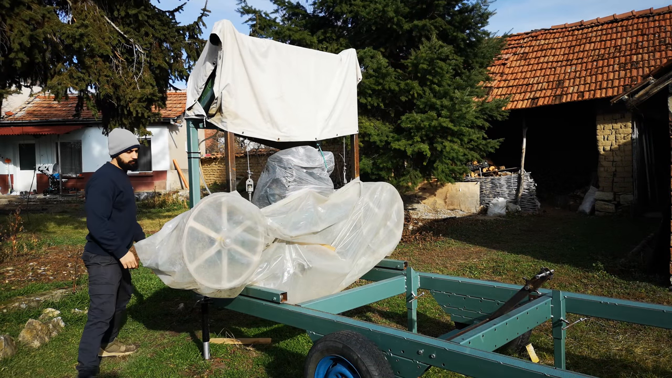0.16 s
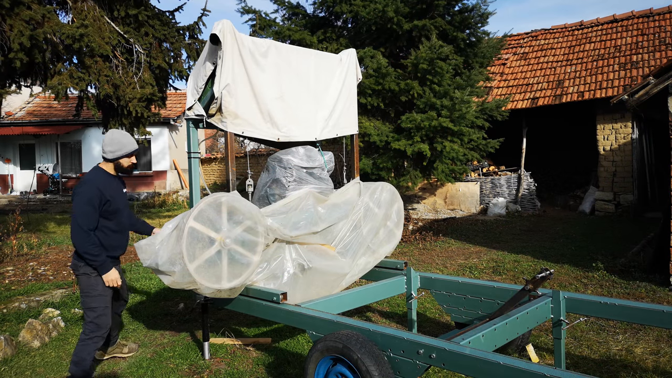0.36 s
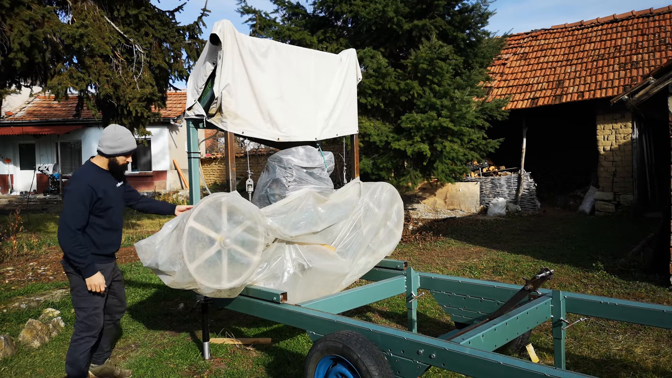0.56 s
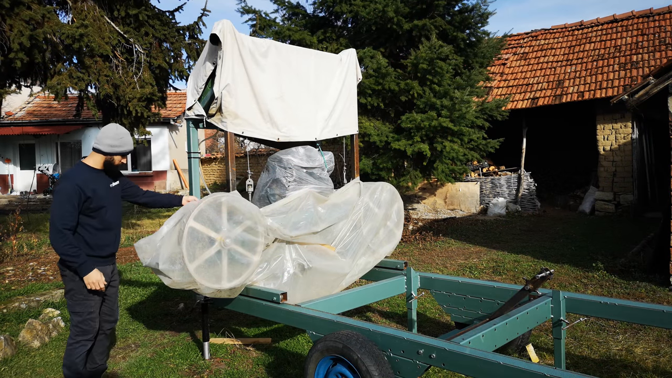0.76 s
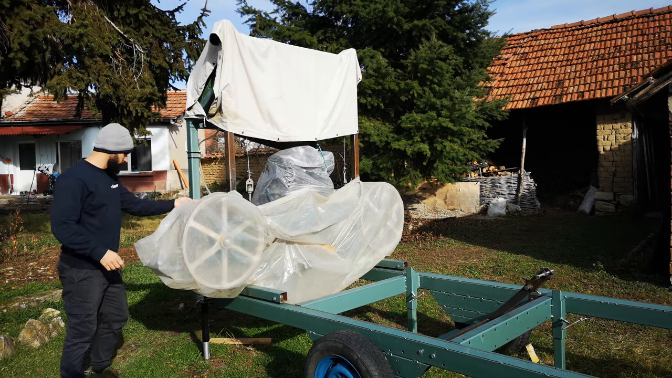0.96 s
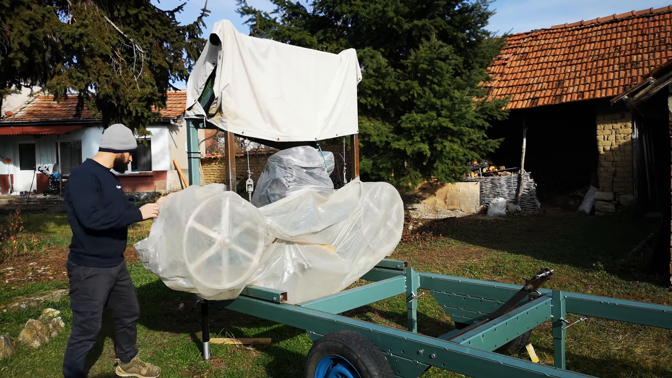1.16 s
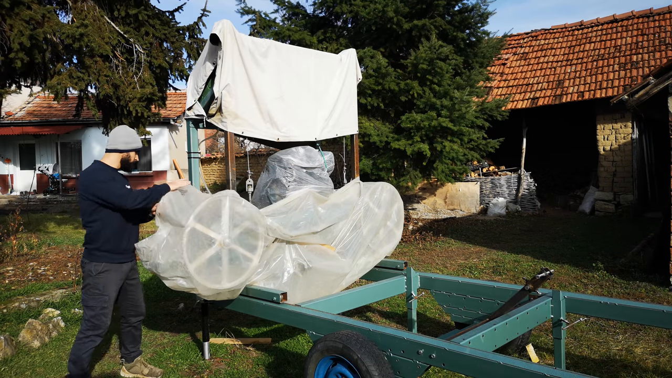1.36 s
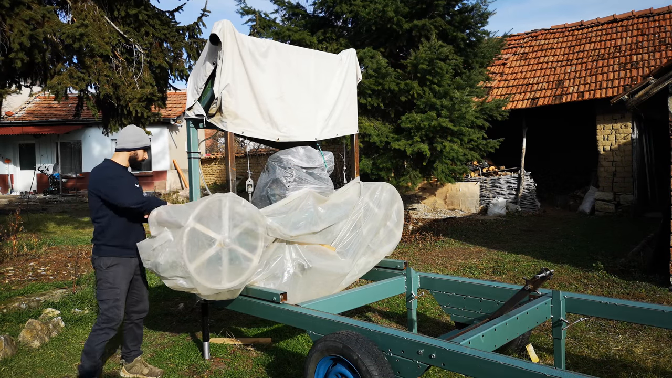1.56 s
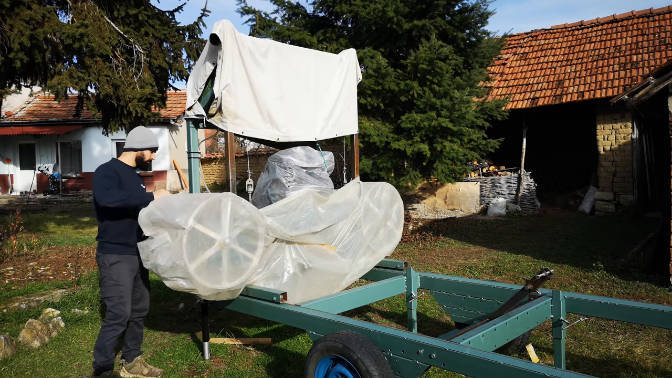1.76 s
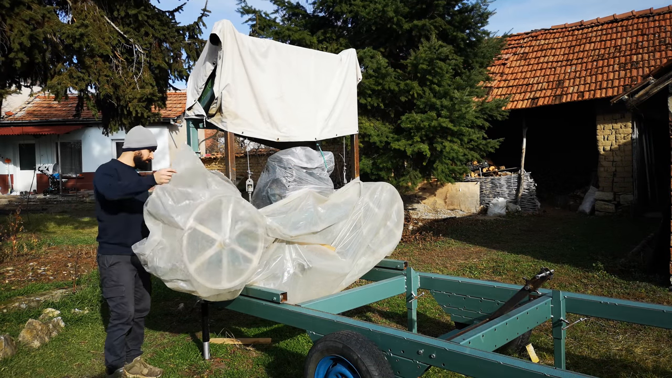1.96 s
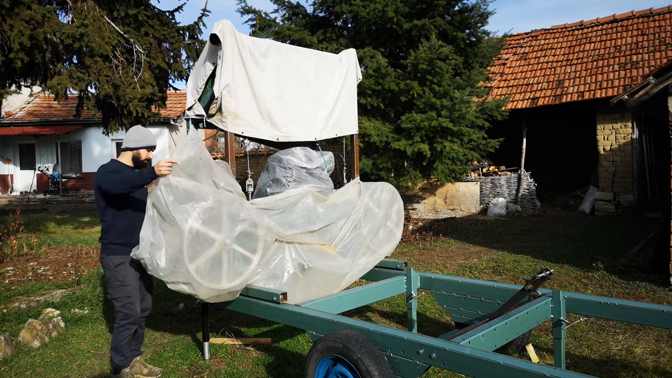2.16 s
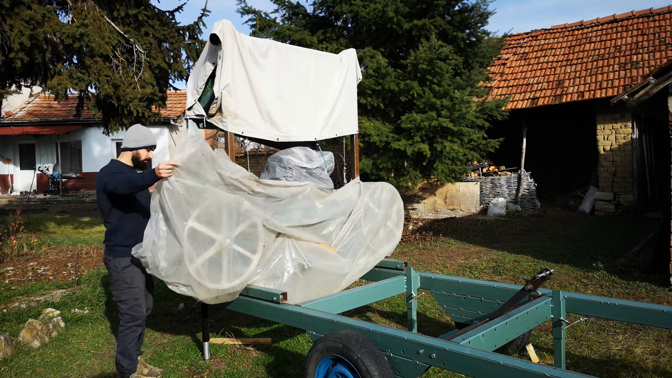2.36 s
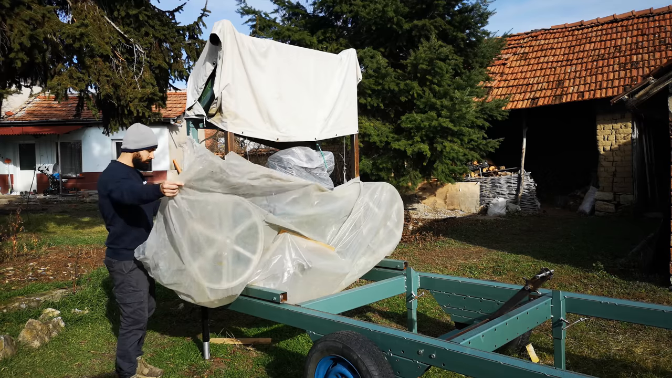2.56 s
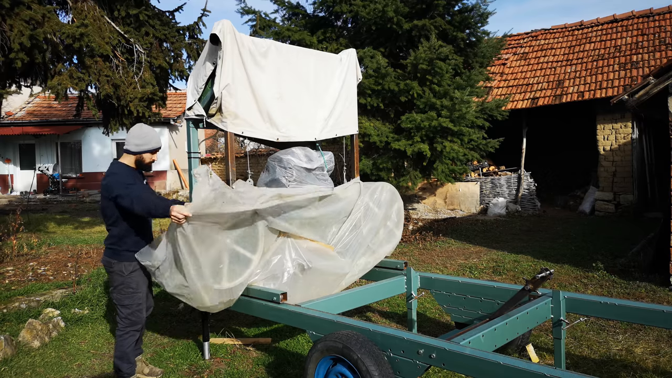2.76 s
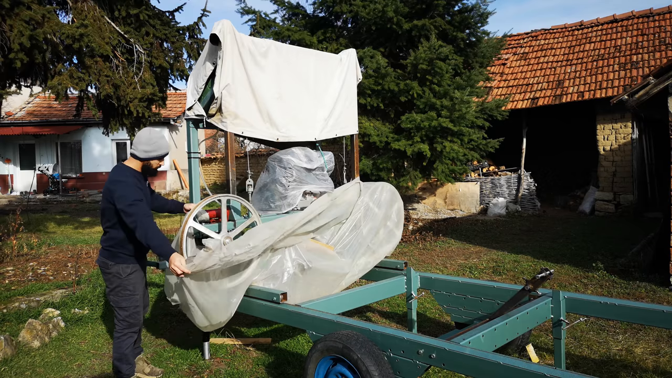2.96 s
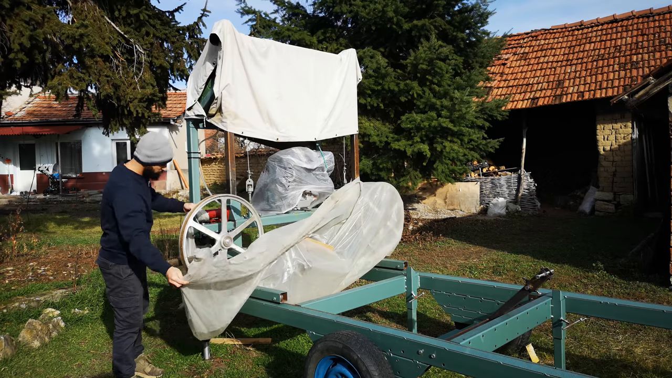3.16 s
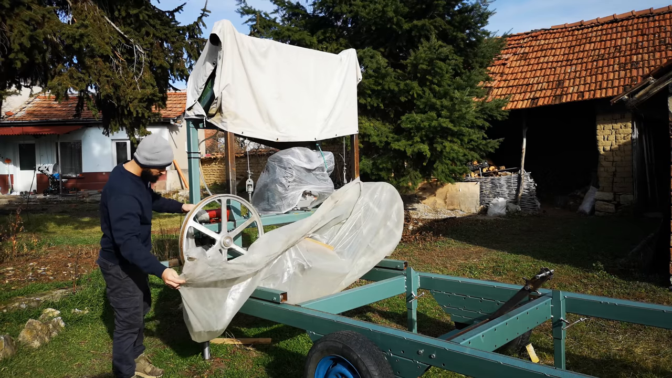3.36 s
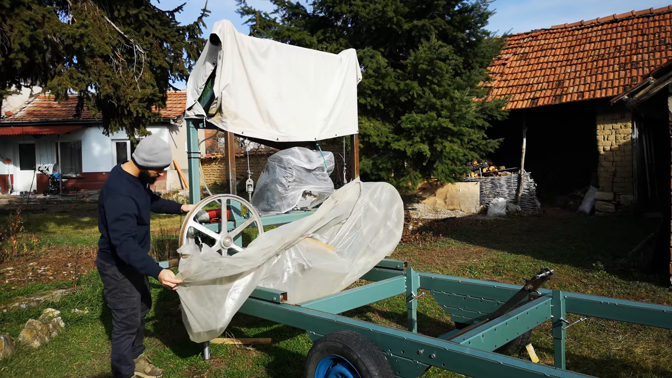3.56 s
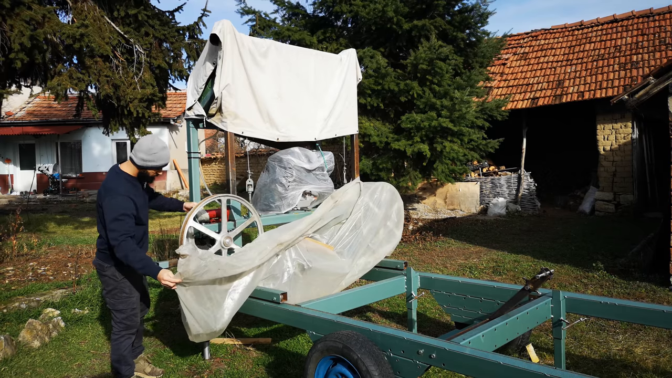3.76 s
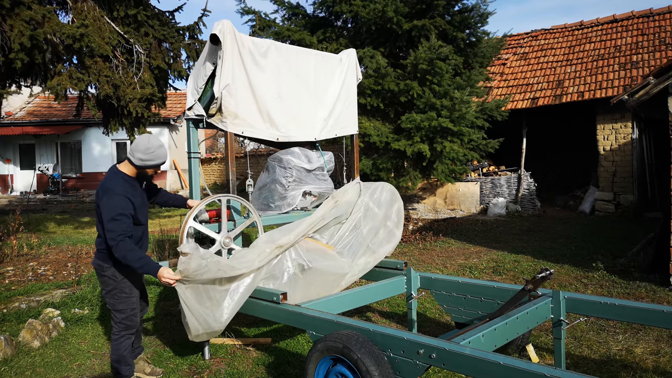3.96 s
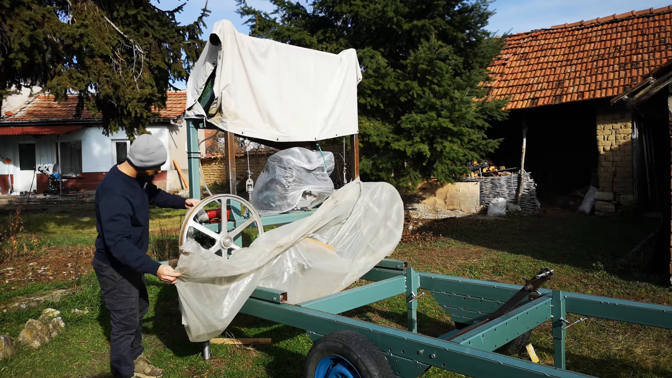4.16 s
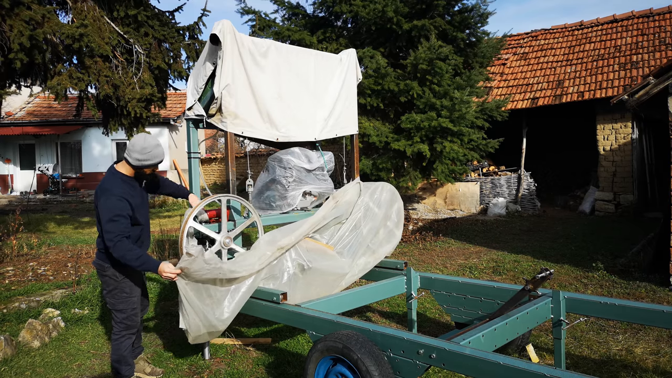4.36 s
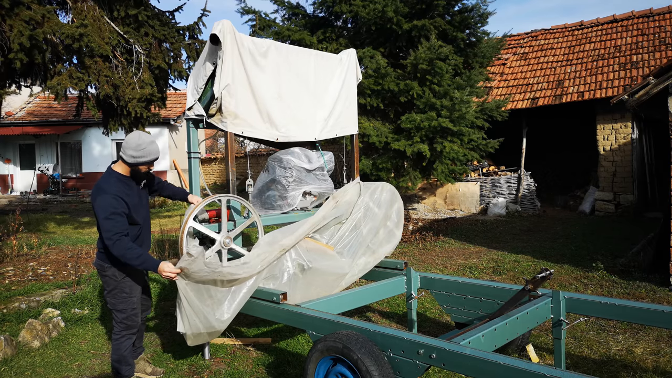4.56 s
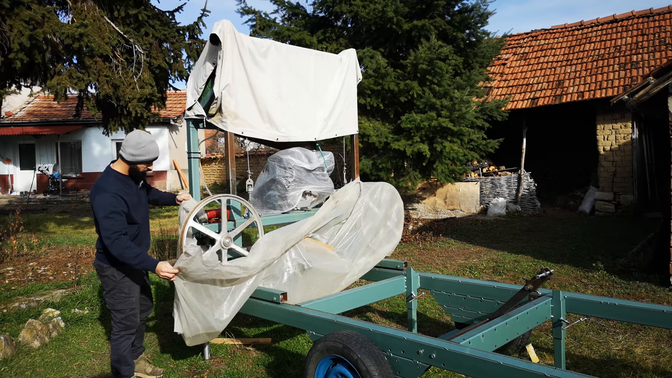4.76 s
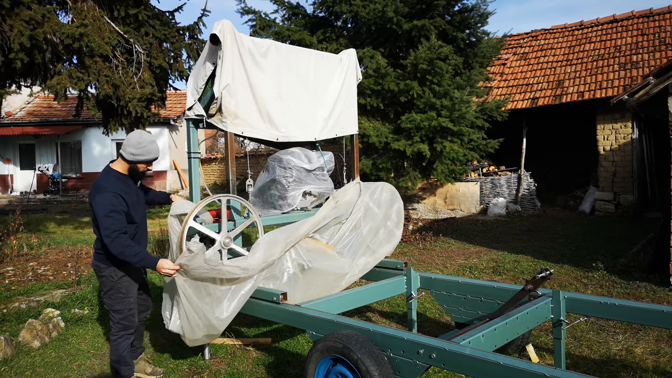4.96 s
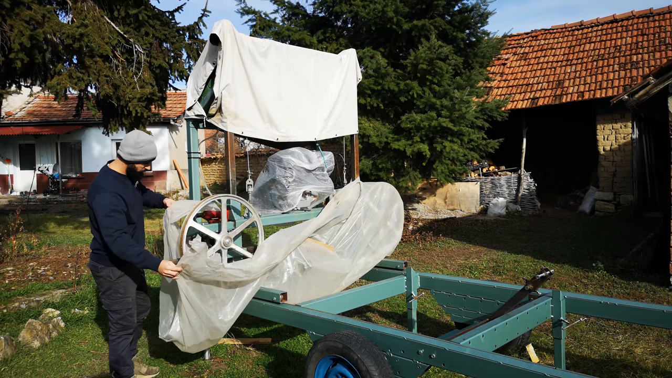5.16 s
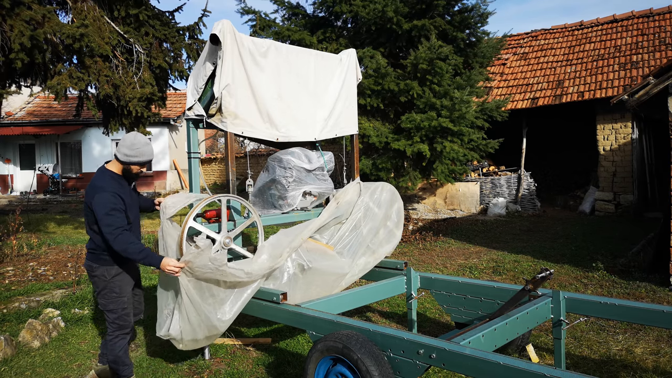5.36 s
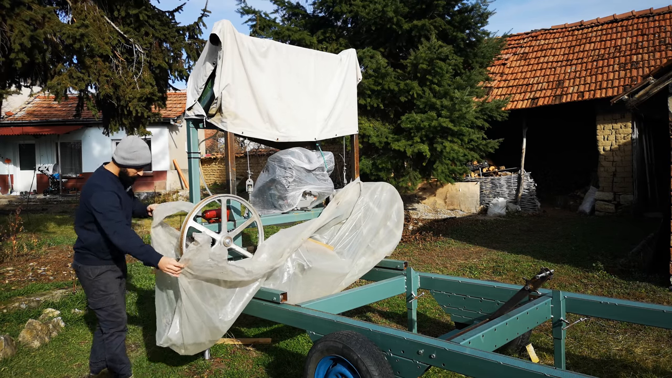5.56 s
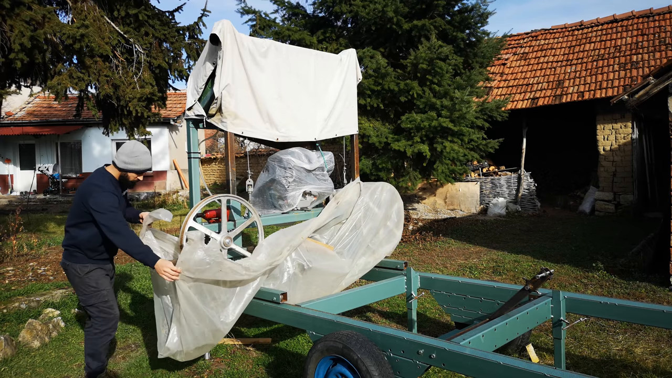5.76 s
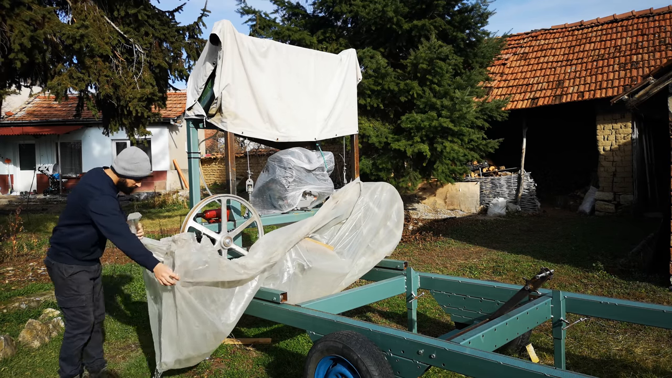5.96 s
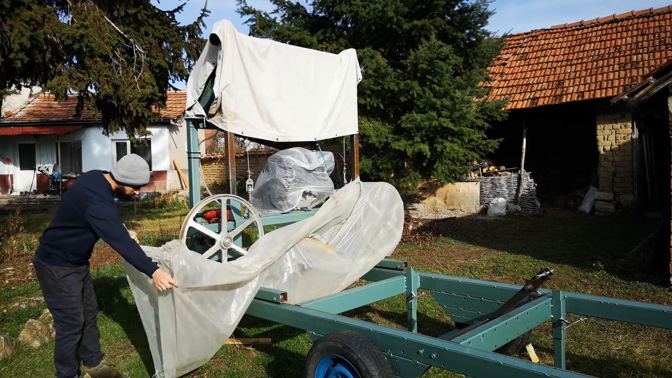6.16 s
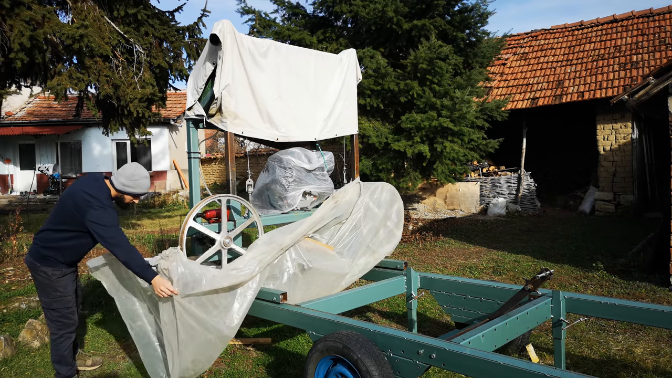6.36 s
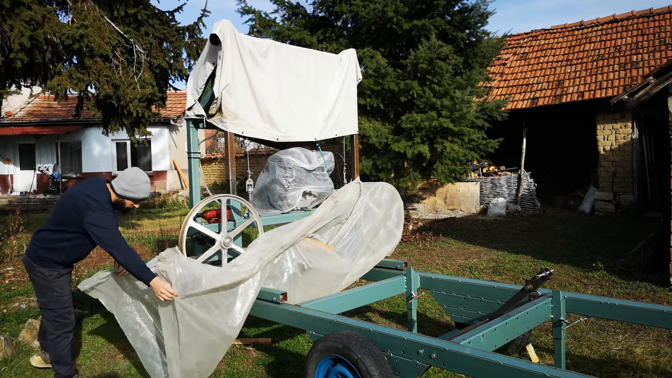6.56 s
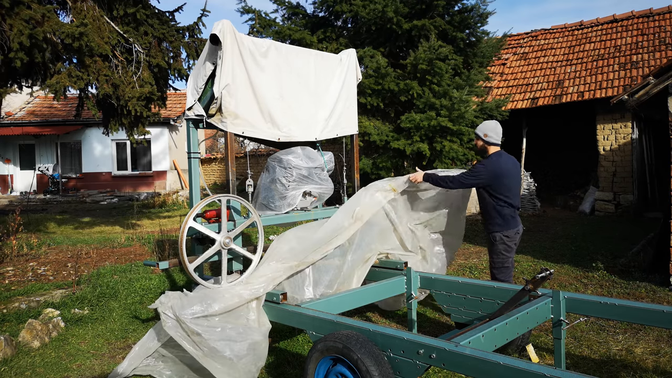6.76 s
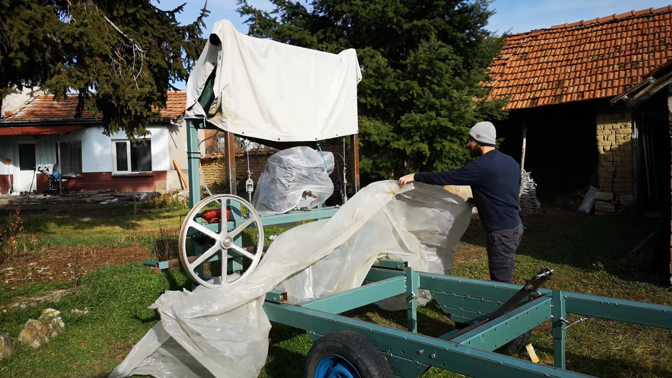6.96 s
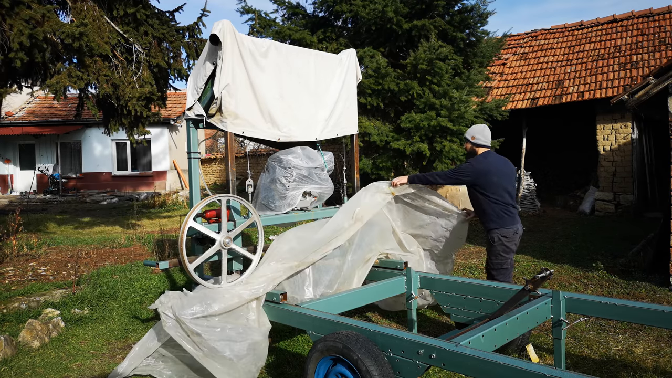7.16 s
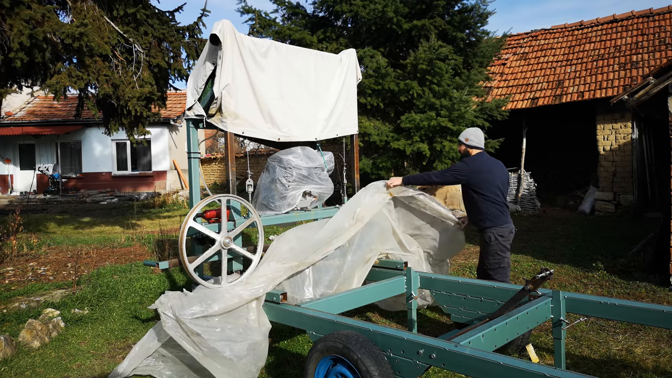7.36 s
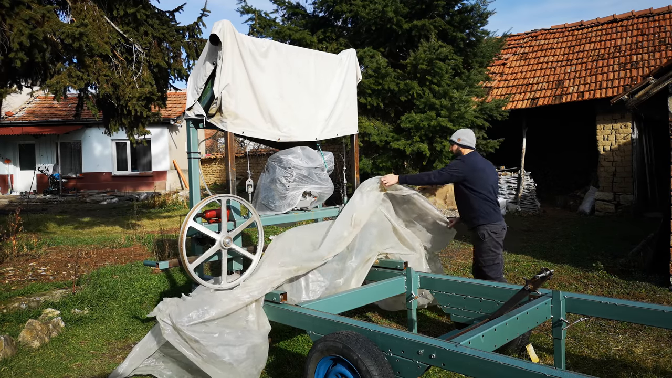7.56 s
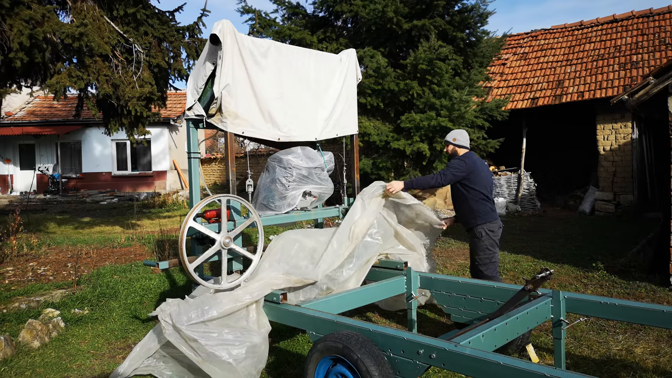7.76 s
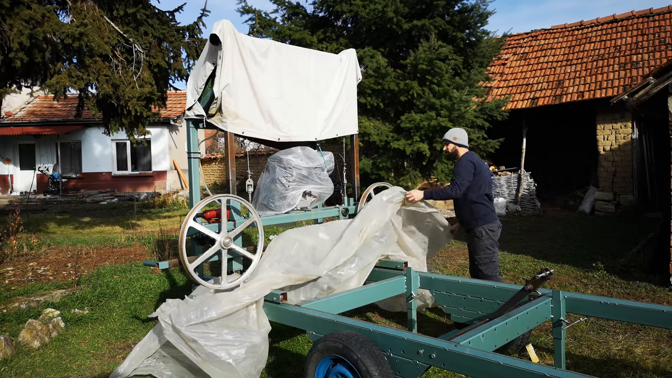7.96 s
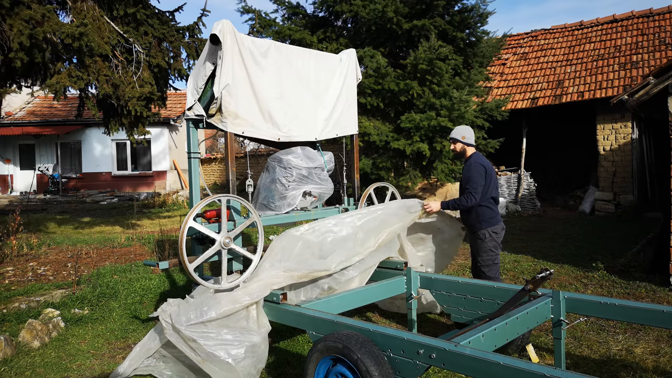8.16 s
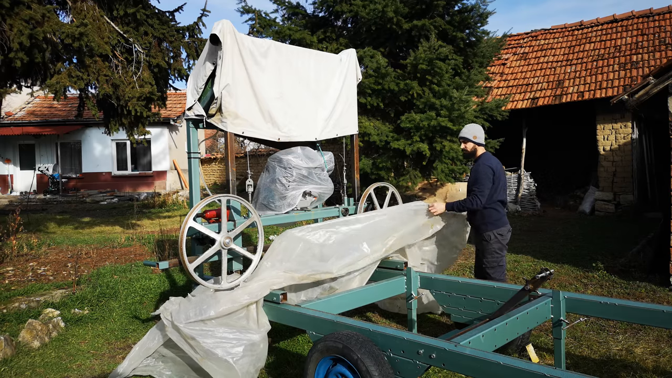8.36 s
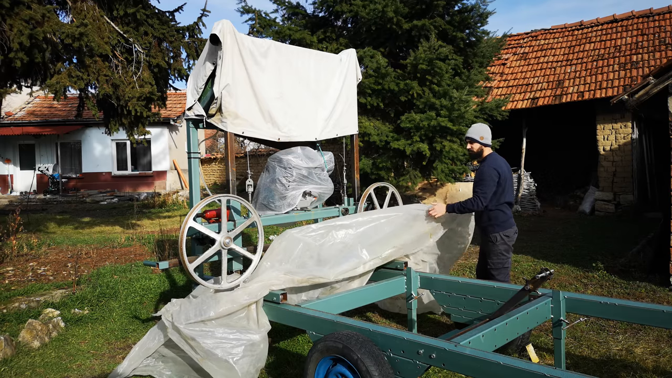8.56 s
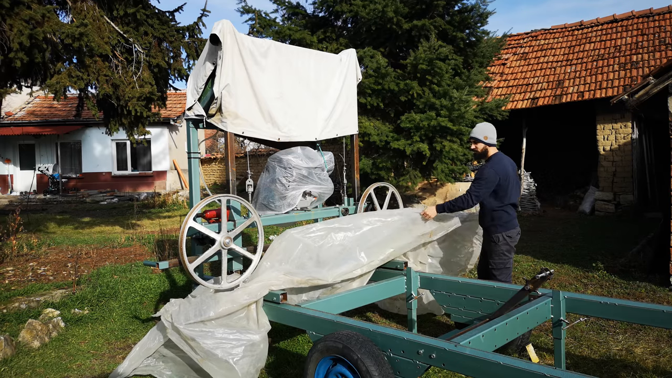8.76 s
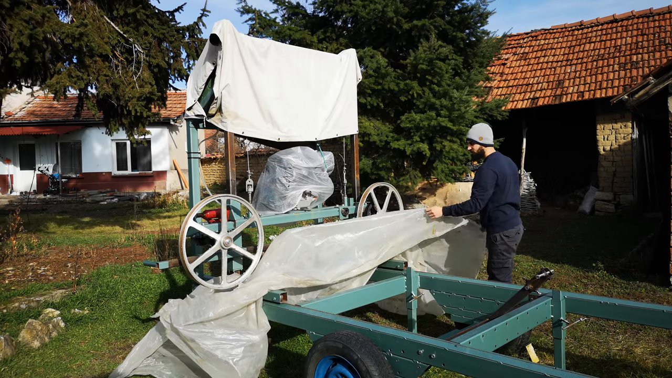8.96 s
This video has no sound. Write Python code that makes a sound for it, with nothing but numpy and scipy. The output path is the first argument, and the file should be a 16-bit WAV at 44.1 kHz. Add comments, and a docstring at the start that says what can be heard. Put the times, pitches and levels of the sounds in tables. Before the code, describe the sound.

A thin plastic sheet is pulled off a metal frame in a quiet yard. It crinkles in a string of short tugs, with sharp snaps from larger creases and a low rustle of loose folds. After a brief lull about a third of the way in, the tugging resumes and carries on to the end. Light wind rumbles on the microphone in puffs, and the yard adds a soft, short echo.

```python
"""In a yard, a sheet of thin plastic is pulled off a metal frame, first from the left, then the right.
With each tug thousands of tiny creases buckle into a crinkle, the largest snap out singly with a knock
and a tick, and the loose folds rustle low. Now and then the film drags over a rim, which sings faintly.
The ground and the walls echo softly; a light wind buffets the microphone."""
import sys
import numpy as np
from scipy import signal
from scipy.fft import rfft, irfft
from scipy.io import wavfile

SR = 44100
rng = np.random.default_rng(int(sys.argv[2]) if len(sys.argv) > 2 else 0)


def wav_out(sig):
    """Save sig, one row per channel (or a flat mono array), as 16-bit PCM at SR to the path in sys.argv[1]."""
    wavfile.write(sys.argv[1], SR, np.round(np.clip(np.atleast_2d(sig).T, -1, 1) * 32767).astype(np.int16))


N = 396900
T = np.arange(N) / SR
HZ = np.fft.rfftfreq(4096, 1 / SR)
SIDE_CHANGE_S = 6.74  # the pulling moves from the left of the frame to the right

# the largest creases: t/s, knock peak level/dB, knock f/Hz, tick level/dB, tick f/Hz
BIG_SNAPS = [(0.736, -44, 1840, -57, 5600), (0.787, -36, 1750, -53.5, 4810), (0.873, -34, 1700, -40, 4870),
             (1.358, -31.5, 1500, -42, 7140), (1.447, -36, 1860, -58, 5540), (1.744, -41, 1950, -47, 4900),
             (2.117, -30, 2240, -44.5, 5880), (2.259, -39, 1940, -42, 4550), (2.42, -44, 1900, -50, 5630),
             (2.615, -46, 2100, -32.5, 4800), (3.193, -29, 2540, -39, 5320),
             (3.601, -47, 1935, -44.5, 4060), (3.886, -59, 1800, -56.5, 4060),
             (4.046, -41, 1907, -60, 7730), (4.078, -40, 1580, -57, 5580), (4.225, -33, 2530, -61, 5050),
             (4.276, -29.5, 1940, -43, 5030), (4.356, -43, 1740, -50, 7200),
             (4.709, -25.5, 1970, -47, 7430), (4.736, -31, 1846, -53, 7810),
             (4.826, -36, 1930, -41.5, 7600), (5.024, -32.5, 1780, -58, 5160),
             (5.057, -33.5, 1770, -54, 3830), (5.128, -33, 1970, -60, 3520),
             (5.238, -32.5, 2130, -48, 5100), (5.293, -35.5, 1140, -41.5, 5270),
             (5.877, -34, 1770, -57, 5050), (5.969, -31, 2420, -42, 5610), (6.092, -33.5, 1900, -46, 7400),
             (6.16, -32, 2400, -43, 5120), (6.178, -32, 1980, -39, 7500), (6.267, -38.5, 1620, -42, 7600),
             (6.67, -39, 1270, -64, 7450), (6.807, -44, 2320, -59, 5040), (6.928, -43.5, 1475, -58, 4450),
             (6.995, -35, 1760, -37, 4530), (7.004, -41, 1360, -45, 5600), (7.156, -44.5, 1910, -54, 4900),
             (7.218, -40, 1750, -52, 3600), (7.368, -39, 2500, -48, 7700), (7.465, -46.5, 1320, -53, 5100),
             (7.575, -45, 1900, -40, 4470), (7.84, -32, 2000, -39, 5700), (7.991, -37.5, 2800, -49, 3500),
             (8.105, -51, 1700, -50.5, 4940), (8.237, -39.5, 1860, -63, 5400),
             (8.334, -31, 1310, -38, 5570), (8.384, -37, 2500, -37, 5850), (8.394, -42, 1980, -42, 4600),
             (8.862, -44, 1940, -47, 5360), (8.924, -44, 1800, -45, 5600)]


def amp(db):
    """Decibels to gain."""
    return 10 ** (np.asarray(db) / 20)


def rms(x):
    """Root mean square."""
    return np.sqrt(np.mean(x ** 2) + 1e-20)


def curve(points, hz):
    """A table's values at hz, joined on a log-frequency axis."""
    f, value = np.transpose(points)
    return np.interp(np.log(hz + 1), np.log(f + 1), value)


def band(x, lo_hz, hi_hz, order=3):
    """Causal band-pass."""
    sos = signal.butter(order, [lo_hz, min(hi_hz, SR / 2 - 1)], "band", fs=SR, output="sos")
    return signal.sosfilt(sos, x)


def colour(x, db):
    """Minimum-phase EQ with the gain db on the grid HZ: clicks keep their sharp attack."""
    log_gain = np.log(amp(np.r_[db, db[-2:0:-1]]))
    taps = np.fft.ifft(np.exp(np.conj(signal.hilbert(log_gain)))).real
    return signal.oaconvolve(x, taps[None], axes=1)[:, :x.shape[1]]


def drift(rate_hz):
    """Smooth random modulation of unit RMS."""
    rolloff = 1 + (np.fft.rfftfreq(N, 1 / SR) / rate_hz) ** 4
    slow = irfft(rfft(rng.standard_normal(N)) / rolloff, N)
    return slow / rms(slow)


def noise(spectrum, alike):
    """Coloured stereo noise, from wide (alike=0) to mono (alike=1)."""
    shared, left, right = rng.standard_normal((3, N))
    white = np.sqrt(alike) * shared + np.sqrt(1 - alike) * np.array([left, right])
    x = irfft(rfft(white) * amp(curve(spectrum, np.fft.rfftfreq(N, 1 / SR))), N)
    return x / rms(x.mean(0))


def add(mix, s, sound):
    """Mixes in a multichannel sound at s seconds."""
    part = mix[:, max(round(s * SR), 0):][:, :sound.shape[1]]
    part += sound[:, :part.shape[1]]


def yard_air(level_db=-74):
    """The quiet yard: a wide, steady bed of noise."""
    # colour of the ambience: f/Hz, level/dB
    spectrum = [(59, -18), (100, -8), (204, -6.5), (570, -17.5), (1700, -10.5), (4000, -18), (5600, -18),
                (7510, -19.5), (10100, -31.5), (15000, -29)]
    return amp(level_db) * noise(spectrum, alike=.13)


def wind(lumpy_db=2, gain_db=.5, breeze_db=-63, breeze_db_per_s=-.3):
    """Lumpy low buffeting on the microphone: a slowly easing breeze, and puffs that swell and die."""
    # colour of the rumble: f/Hz, level/dB
    spectrum = [(10, -7), (25, 2.5), (42, -2), (65, -8), (100, -18), (160, -32), (300, -40), (800, -93)]
    # puffs of wind: peak t/s, length/s, level/dB
    gusts = [(0.355, 0.087, -53), (0.665, 0.078, -50), (1.15, 0.24, -49), (1.36, 0.22, -51.5),
             (2.455, 0.084, -37), (2.608, 1, -44.5), (2.932, 0.27, -47), (3.9, 0.28, -49),
             (4.137, 0.13, -44.5), (4.29, 0.32, -55), (4.635, 0.12, -44), (5.05, .1, -54.5),
             (5.25, 0.22, -54), (6.002, .2, -56), (6.278, .25, -56.5), (6.698, 0.12, -48.5),
             (7.196, .12, -59.5), (7.68, 0.14, -65)]
    rumble = noise(spectrum, alike=.97) * amp(lumpy_db * drift(9))
    power = amp(breeze_db + breeze_db_per_s * T) ** 2
    for s, length_s, db in gusts:
        swell = np.cos(np.pi * np.clip((T - s) / length_s, -.5, .5))
        power += (amp(db) * swell) ** 2
    return rumble / rms(rumble) * amp(gain_db) * np.sqrt(power)


def pull(take_up_s=.06, grab_s=.7):
    """Tugs take up the slack, swell and settle: dB envelopes of the crinkle, its treble and its bass."""
    # tugs at the sheet: start t/s, length/s, crinkle level at the end of the pull/dB, swell/dB,
    # settling/(dB/s), relative treble of sharp creases/dB, relative bass of flexing folds/dB
    tugs = [(0.688, .21, -41.5, 15, 300, -6.5, -7.5), (0.978, 0.22, -44, 21, 75, -9.5, -11.5),
            (1.186, 0.16, -40, 7, 86, -6, -9), (1.608, 0.24, -46.5, 3, 230, -9, -7.5),
            (1.863, .39, -42, 13, 64, -8.5, -10), (2.371, .31, -42.5, 7, 58, -3.5, -12),
            (2.726, 0.2, -43.5, 1, 283, -.5, -11), (2.923, .24, -45, 4, 52.5, -7, -11),
            (3.84, 0.17, -61.5, 8, 100, -9.5, -18), (4.007, 0.16, -50, -1.5, 46, -9, -16.5),
            (4.213, 0.063, -49.5, 2, 41, -7, -14), (4.546, 0.27, -45, 9, 77, -5.5, -15),
            (4.858, 0.21, -48, -0.5, 75, -6, -11), (5.082, .2, -48, -2, 170, -6.5, -7),
            (5.344, 0.1, -56.5, 0, 58, -5.5, -6.5), (5.576, 0.077, -60.5, 1.5, 78, -5.5, -17),
            (5.697, .255, -47.5, 15.5, 61, -5, -8.5), (6.042, 0.082, -50, 0.5, 350, -1, -11),
            (6.129, 0.053, -43.5, 3.5, 42, -4.5, -10), (6.27, 0.14, -43, 8.5, 382, -7, -6),
            (6.45, 0.28, -57.5, 3.5, 126, -5.5, -8.5), (6.839, 0.16, -47.5, 16, 183, -5.5, -10),
            (7.071, 0.19, -56.5, 2, 177, -5, -4), (7.287, 0.26, -50.5, 15.5, 89, -6, -10),
            (7.544, 0.32, -44, -3.5, 163, -7, -9), (8.01, 0.17, -59, 0.5, 150, -9, -5.5),
            (8.171, .24, -40.5, 13.5, 172, -8, -9.5), (8.504, 0.18, -59, 4.5, 50, -6.5, -4),
            (8.807, 0.16, -53.5, -1.5, 80, -7, -8.5)]
    power = amp([[-75], [-84.5], [-74]]) ** 2 * (T > grab_s)  # once held, the sheet is never quite still
    settle_speed = np.array([[1], [1.25], [1]])  # the treble dies first
    t = T[:SR]
    attack = np.minimum(t / take_up_s, 1)
    for start_s, length_s, db, swell_db, settle_db_per_s, treble_db, bass_db in tugs:
        pull_db = db - swell_db * np.maximum(1 - t / length_s, 0) + np.array([[0], [treble_db], [bass_db]])
        fade_db = settle_speed * settle_db_per_s * np.maximum(t - length_s, 0)
        add(power, start_s, (attack * amp(pull_db - fade_db)) ** 2)
    return 10 * np.log10(power + 1e-12)


def crease(hz, cycles, tick_s, size=512):
    """One buckling crease: the brief ring of its panel and its dry tick, both of unit energy."""
    t = T[:size]
    ring = np.sin(2 * np.pi * hz * t) * np.exp(-t * hz / cycles)
    tick = rng.standard_normal(size) * np.exp(-t / tick_s)
    return ring / np.linalg.norm(ring), tick / np.linalg.norm(tick)


def arrive(click, lag_ms, spread_ms, bounce=.65, count=5):
    """A click reaches two microphone ports, directly and by short bounces off frame, folds and ground."""
    lag = lag_ms + spread_ms * rng.standard_normal()  # the left port hears it this much later
    phase_per_ms = -2j * np.pi * HZ / 1000
    direct = np.exp(phase_per_ms * np.array([[1 + lag / 2], [1 - lag / 2]]))
    late_ms = rng.uniform(2.192, 6.5, count) + rng.normal(0, .1, (2, count))
    bounces = rng.uniform(-1, 1, count)[:, None] * np.exp(phase_per_ms * late_ms[..., None])
    paths = direct + bounce * bounces.sum(1)
    return irfft(rfft(click, 2 * len(HZ) - 2) * paths)[:, :len(HZ) // 2]


def crackle(per_s, lag_ms, size_db=1.5, ring_share=.63, shift_db=3, panels=36):
    """Creases buckle at random; which panel sizes are busy shifts as the sheet changes shape."""
    out = np.zeros((2, N))
    onsets = np.flatnonzero(rng.random(N) < per_s / SR)
    size = amp(size_db * np.minimum(rng.exponential(1, N), 4.9))
    kick = size * rng.choice([-1, 1], N) / np.sqrt(per_s)  # denser, but no louder
    panel = rng.integers(0, panels, N)
    for group in np.array_split(np.arange(panels), 6):
        busy = amp(shift_db * np.clip(drift(17.2), -2, 2))
        for k in group:
            hz = 800 * 10 ** (k / panels)
            ring, tick = crease(hz, cycles=1.9, tick_s=.00084)
            train, hits = np.zeros(N), onsets[panel[onsets] == k]
            train[hits] = kick[hits] * busy[hits]
            click = arrive(tick + ring_share * np.sqrt(hz / 3000) * ring, lag_ms, spread_ms=.0265)
            out += signal.oaconvolve(train[None], click, axes=1)[:, :N]
    return out / rms(out)


def port_db():
    """The microphone ports resonate: EQ bumps in the treble, on the grid HZ."""
    # port resonances: f/Hz, width/Hz, boost/dB
    ports = [(1800, 640, 5), (5616, 2300, 3.5), (7630, 1300, 7)]
    return sum(db / (1 + (2 * (HZ - hz) / width) ** 2) for hz, width, db in ports)


def crinkle(level_db, treble_db, spectrum, lag_ms, body_db, edge_db, clump_db=1.5):
    """Faster pulling buckles more creases, in clumps, over the soft hiss of film sliding on film."""
    creases_per_s = np.clip(3200 * amp(.8 * (level_db + 48)), 700, 12000)
    grains = crackle(creases_per_s, lag_ms) * amp(clump_db * drift(55))
    hiss = .4 * rng.standard_normal((2, N))
    film = colour(grains + hiss, curve(spectrum, HZ) + port_db())
    body, edge = band(film, 620, 3200), band(film, 3600, 20000)
    body = body / rms(body.mean(0)) * amp(body_db)
    edge = edge / rms(edge.mean(0)) * amp(edge_db + treble_db - level_db)
    sheen = signal.sosfiltfilt(signal.butter(4, 8500, "high", fs=SR, output="sos"), edge)
    sheen_db = .35 * np.clip(treble_db + 50, -3, 10)  # a fast slide hisses highest
    return (body + edge + sheen * (amp(sheen_db) - 1)) * amp(level_db + tension())


def folds(flex_db, gain_db=-1.5, flap_db=2, left_lag_ms=-.39, right_lag_ms=.3):
    """Large loose folds flex and flap: a low rustle, nearly mono, with a slight delay between channels."""
    # colour of the low rustle: f/Hz, level/dB
    spectrum = [(30, -26), (55, -12), (80, 2.5), (120, -0.5), (190, -1), (250, -6), (400, -6.5),
                (560, -11.5), (750, -14), (1500, -61.5)]
    rustle = noise(spectrum, alike=1) * amp(flap_db * drift(40))
    lag_s = np.where(T < SIDE_CHANGE_S, left_lag_ms, right_lag_ms) / 1000
    rustle[0] = np.interp(T - lag_s, T, rustle[0])
    return rustle / rms(rustle) * amp(gain_db + flex_db)


def yard_echo(x, echoes_per_s=2500, predelay_s=.014, size=22050):
    """Scattered echoes from walls and trees, after a short gap; the treble dies first."""
    # decay of the yard: f/Hz, T60/s
    decay = [(200, 0.53), (2000, 0.2), (8000, 0.16), (15000, 0.076)]
    taps = rng.standard_normal((2, size)) * (rng.random((2, size)) < echoes_per_s / SR)
    hz, t, frames = signal.stft(taps * (T[:size] > predelay_s), SR, nperseg=256)
    tail = signal.istft(frames * amp(-60 * t / curve(decay, hz)[:, None]), SR)[1]
    return signal.fftconvolve(x, tail / np.linalg.norm(tail[0]), axes=1)[:, :N]


def tension(hold_db=3, hold_s=.028, release_db=2, release_s=.0091):
    """The sheet stiffens and hushes just before a big snap, then lets go in a flurry; in dB."""
    db = np.zeros(N)
    for s, *_ in BIG_SNAPS:
        near = abs(T - s) < .15
        t = T[near] - s
        hush = -hold_db * np.exp(-abs(t) / hold_s)
        flurry = release_db * np.exp(-abs(t) / release_s)
        db[near] += np.where(t < 0, hush, flurry)
    return db


def burst(hz, ring_s, rattle_s, rattle_share, size=900):
    """A patch of film rings for a few cycles while the creases round it rattle."""
    t = T[:size]
    ring = np.sin(2 * np.pi * hz * t) * np.exp(-t / ring_s)
    rattle = band(rng.standard_normal(size) * np.exp(-t / rattle_s), .6 * hz, 1.45 * hz, order=2)
    return ring / rms(ring) + rattle_share * rattle / rms(rattle)


def snap(s, knock_db, knock_hz, tick_db, tick_hz, left_lag_ms=-.12, right_lag_ms=.062):
    """A crease flips with a thin knock of its panel and a sharp tick."""
    lag_ms = left_lag_ms if s < SIDE_CHANGE_S else right_lag_ms
    knock = band(burst(knock_hz, ring_s=.002, rattle_s=.0035, rattle_share=.9), 850, 3400, order=2)
    tick = band(burst(tick_hz, ring_s=.00025, rattle_s=.0016, rattle_share=1.3), 3000, 9000, order=1)
    out = 0
    for layer, db in (knock, knock_db), (tick, tick_db):
        stereo = arrive(layer, lag_ms, spread_ms=.02, bounce=.2)
        out = out + amp(db) * stereo / rms(stereo[:, 40:260])  # the first 5 ms set the level
    return out


def snaps(crinkle_db, treble_db, crest_db=8, tick_gain_db=-1, small_per_s=12):
    """The big creases snap on cue; smaller ones pop at random, riding the level of the crinkle."""
    out = np.zeros((2, N))
    for s, peak_db, knock_hz, tick_db, tick_hz in BIG_SNAPS:
        add(out, s, snap(s, peak_db - crest_db, knock_hz, tick_db + tick_gain_db, tick_hz))
    for when, size, bright, panel in rng.random((round(small_per_s * N / SR), 4)):
        i, pitch = int(when * N), 2 ** (panel - .5)
        knock_db = crinkle_db[i] + 2 * size - 1.5
        tick_db = treble_db[i] + tick_gain_db + 2 * (size + bright - 1)
        add(out, T[i], snap(T[i], knock_db, 1950 * pitch, tick_db, 5350 * pitch))
    return out


def rim_rubs(width_hz=170):
    """Film dragging over a metal rim feeds one narrow resonance, which sings faintly."""
    # drags over the rim: t/s, length/s, level/dB, f/Hz
    rubs = [(1.002, 0.1516, -60, 1620), (2.289, 0.11, -57, 1840), (3.887, .16, -62.5, 1770)]
    out = np.zeros((2, N))
    for s, length_s, db, hz in rubs:
        drag = rng.standard_normal((2, round(length_s * SR)))
        rim = signal.iirpeak(hz, hz / width_hz, fs=SR)
        tone = signal.lfilter(*rim, signal.lfilter(*rim, drag + drag.mean(0)))
        add(out, s, amp(db) * tone / rms(tone) * signal.windows.tukey(tone.shape[1], .5))
    return out


def shade(x, tilt):
    """The microphone's housing favours one port or the other, depending on pitch and direction."""
    db = curve(tilt, np.fft.rfftfreq(N, 1 / SR))
    return irfft(rfft(x) * amp(np.array([db, -db]) / 2), N)


def scene(echo_db=-15.5):
    """The sheet on either side of the frame, its echo, the wind and the air of the yard."""
    # colour of the sheet on each side of the frame: f/Hz, level/dB
    colour_left = [(290, -45.5), (500, -1.5), (684, -9.5), (883, -4), (1370, -3), (1910, 0), (2530, -1),
                   (4290, -10), (5460, -8.5), (6390, -14.5), (7580, -13), (8490, -17.5), (15000, -31.5)]
    colour_right = [(290, -25), (500, -1.5), (665, -12), (1050, -3.5), (1280, -5), (1830, -3.5), (2610, -1),
                    (4050, -12.5), (5540, -7), (6390, -15.5), (7680, -13), (10100, -22.5), (15000, -35)]
    # stereo balance of the sheet on each side: f/Hz, left minus right level/dB
    tilt_left = [(200, -0.5), (380, -3), (700, 5), (1200, -4.5), (2380, 0), (4400, -4), (7000, 3),
                 (12000, -4.5)]
    tilt_right = [(200, 0.5), (700, -6.5), (1290, 1.5), (2380, -3.5), (4400, -6), (7000, 2), (12000, -5)]
    on_left = T < SIDE_CHANGE_S
    crinkle_db, treble_db, bass_db = pull()
    left = crinkle(crinkle_db, treble_db, colour_left, lag_ms=-.12, body_db=-1.55, edge_db=.83)
    right = crinkle(crinkle_db, treble_db, colour_right, lag_ms=.076, body_db=-1.5, edge_db=-.8)
    sheet = np.where(on_left, left, right) + snaps(crinkle_db, treble_db) + rim_rubs()
    sheet = sheet + amp(echo_db) * yard_echo(sheet) + folds(bass_db)
    sheet = np.where(on_left, shade(sheet, tilt_left), shade(sheet, tilt_right))
    return sheet + wind() + yard_air()


def record(dry, cutoff_hz=15500):
    """A steep low-pass trims the very top."""
    lowpass = signal.firwin(511, cutoff_hz, window=("kaiser", 9), fs=SR)
    return signal.oaconvolve(dry, lowpass[None], "same")


dry = scene()
out = record(dry)
wav_out(out)
```